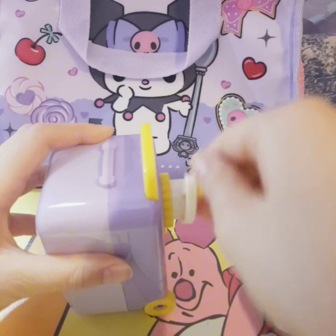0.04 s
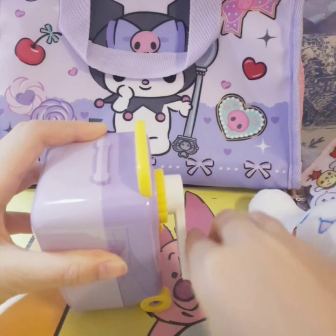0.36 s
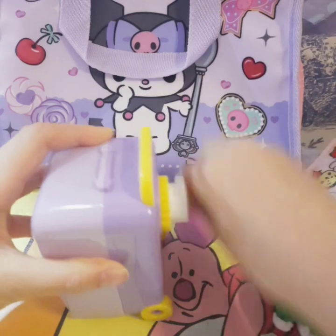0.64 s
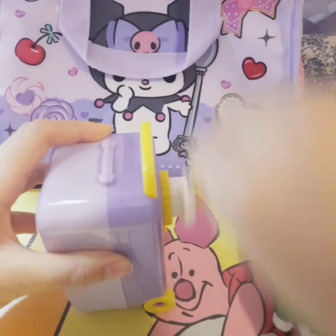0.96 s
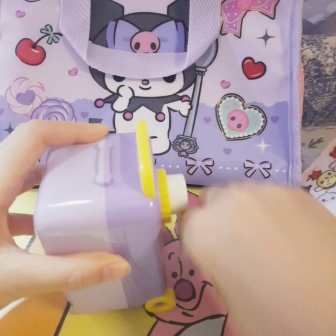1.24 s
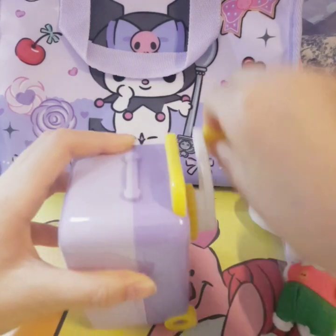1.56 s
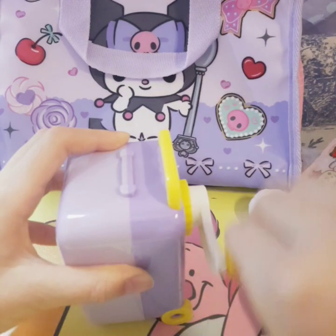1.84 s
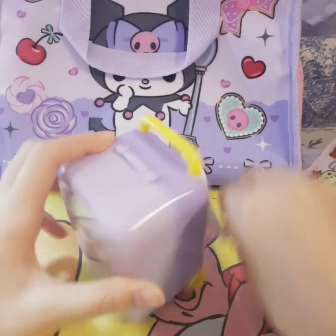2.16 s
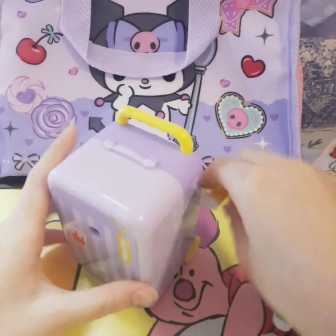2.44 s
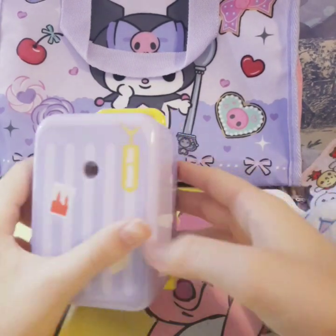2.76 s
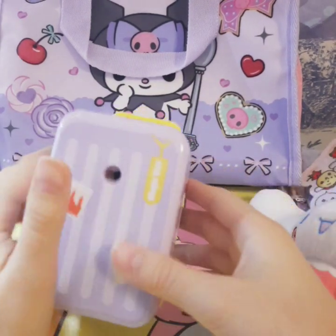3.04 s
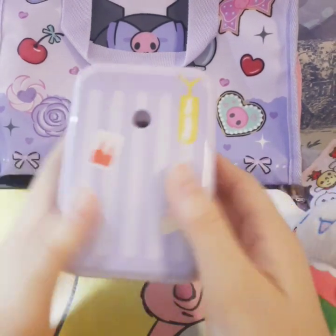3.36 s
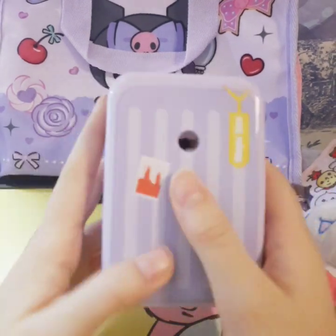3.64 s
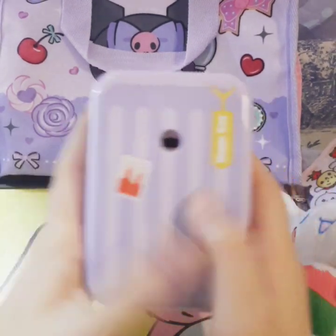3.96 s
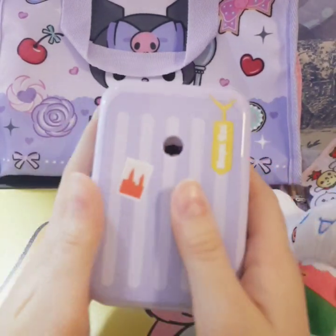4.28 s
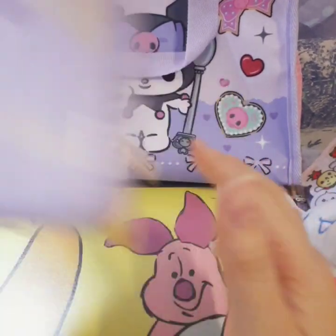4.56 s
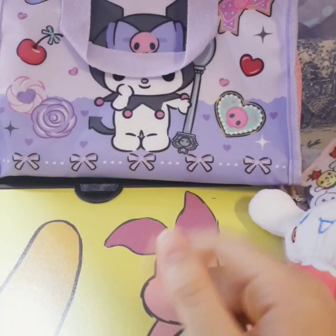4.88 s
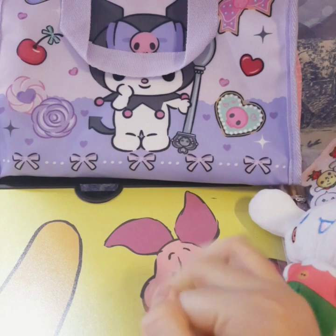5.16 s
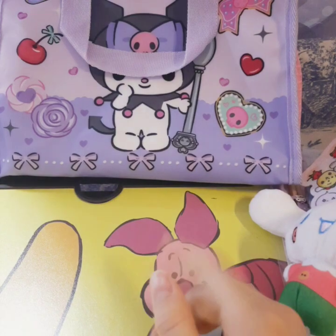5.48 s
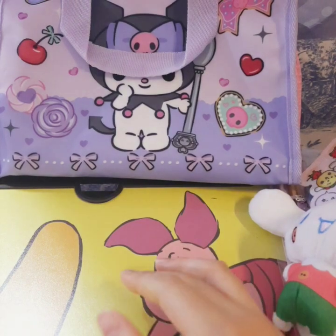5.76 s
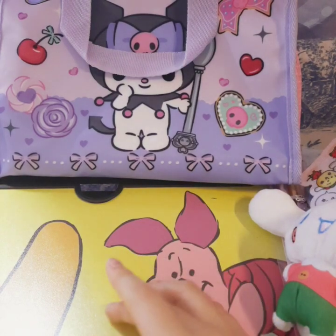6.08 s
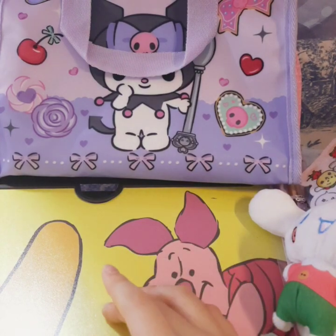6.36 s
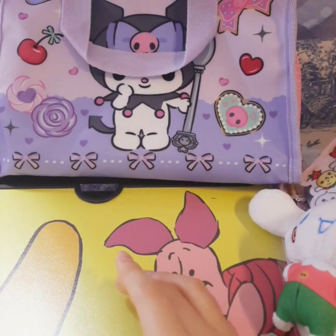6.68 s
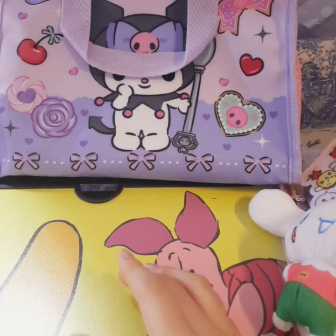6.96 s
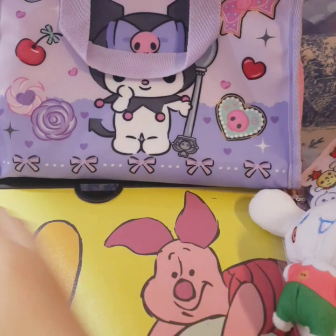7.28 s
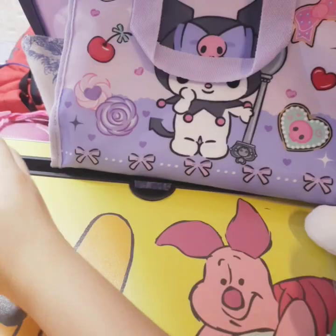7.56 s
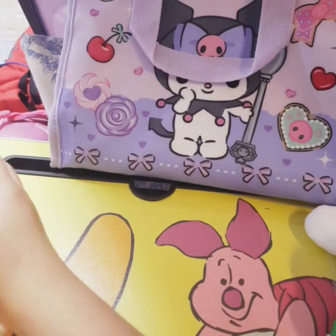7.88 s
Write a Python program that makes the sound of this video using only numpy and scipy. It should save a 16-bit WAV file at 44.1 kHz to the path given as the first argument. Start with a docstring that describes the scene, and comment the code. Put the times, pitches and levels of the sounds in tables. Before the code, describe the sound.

A plastic pencil sharpener is cranked with rasping, clacking gears, then handled with clicks and rubs, before microphone thumps and a metal clink.

```python
"""A plastic crank pencil sharpener on a desk in a small quiet room, close to a camera's stereo microphones.
For the first 2.7 s it is cranked: its gears rasp, knock and click, and its shaking booms through the
desk, mostly into the right microphone. It is then turned in the hands and put aside; fingers rub, tap
and squeak. After 7 s a hand takes hold of the camera's stand, which thumps, rumbles and clinks."""
import sys
import numpy as np
from scipy import signal
from scipy.fft import rfft, irfft, next_fast_len
from scipy.io import wavfile
from scipy.ndimage import map_coordinates

SR = 44100
rng = np.random.default_rng(int(sys.argv[2]) if len(sys.argv) > 2 else 0)


def wav_record(signal):
    """Record a signal, one row per channel, as 16-bit PCM in the file named by sys.argv[1]."""
    frames = np.transpose(np.atleast_2d(signal))
    bounded = np.clip(frames, -1, 1)
    # unit amplitude maps onto the largest positive 16-bit level
    quanta = np.round(bounded * 32767).astype(np.int16)
    wavfile.write(sys.argv[1], SR, quanta)


N = 349272

# the gears knock as they take up their play: start_s, level_db
GEAR_CLACKS = [(0.054, -35), (0.112, -30), (0.159, -32), (0.17, -29), (0.2205, -28), (0.3084, -43),
               (0.3615, -42), (0.4097, -41.5), (0.6844, -31), (0.724, -33), (0.7584, -27), (0.938, -49),
               (1.067, -42), (1.185, -31.5), (1.733, -38)]
# fingers sliding on plastic and on the mat: start_s, length_s, level_db, brightness_db
FINGER_RUBS = [(2.11, 0.087, -67, 4), (2.68, 0.011, -47, -12.5), (3.165, 0.073, -59, -23.5),
               (3.325, 0.025, -56, 1), (3.692, 0.035, -65, -5.5), (3.96, 0.05, -64, -7),
               (4.12, 0.094, -75.5, 0), (4.38, 0.12, -58.5, -12), (4.46, 0.041, -44.5, -5),
               (4.925, 0.078, -56.5, -29), (5.064, 0.16, -57, -7), (5.7, 0.038, -55.5, -9.5),
               (5.878, 0.055, -51, -6), (6.035, 0.083, -60.5, -14.5)]
# hard plastic contacts: start_s, level_db, brightness_db
PLASTIC_CLICKS = [(0.152, -32, -11.5), (0.2194, -33, -13), (0.2415, -34.5, -6.5), (0.6411, -24, -14),
                  (1.017, -45.5, -5), (1.1693, -32, -21), (1.252, -35, -3.5), (1.4613, -14, -9.5),
                  (1.829, -49.5, 1), (2.1158, -29, -15), (2.3202, -24, -14), (2.352, -17.5, -13),
                  (2.984, -40, -19.5), (3.3429, -22, -41.5), (3.6059, -37.5, -17.5), (4.4996, -27.5, -4),
                  (4.5257, -18.5, -18), (4.561, -33.5, 3), (5.0668, -34.5, -17), (5.219, -44, 4),
                  (5.8852, -42, -6), (7.894, -32, -5)]
# treble radiated by a contact itself: frequency_hz, gain_db
EDGE_SPECTRUM = [(1700, -30), (2800, 2), (4800, -2), (6000, 0), (8600, -8), (11000, -3), (15000, -10),
                 (17000, -24)]
RASP_ATTACK_S, RUB_ATTACK_S, RUB_RELEASE_S = 0.0073, 0.011, 0.011


def amp(db):
    """Decibels to gain."""
    return 10 ** (np.asarray(db) / 20)


def unit(x):
    """Scaled to rms 1."""
    return x / np.sqrt(np.mean(x ** 2) + 1e-20)


def along(points, hz):
    """(frequency_hz, value) points read on a log axis."""
    freqs, values = np.transpose(points)
    return np.interp(np.log(hz + 1), np.log(freqs + 1), values)


def curve(points):
    """(time_s, value) points read at every sample."""
    return np.interp(np.arange(N) / SR, *np.transpose(points))


def wobble(rate):
    """A smooth random curve, rate knots a second."""
    return map_coordinates(rng.standard_normal(int(N * rate / SR) + 4), [np.arange(N) * rate / SR])


def gate(start_s, end_s, edge_s):
    """Gain 1 between start and end, with soft edges."""
    t = np.arange(N) / SR
    return np.clip(np.minimum(t - start_s, end_s - t) / edge_s + .5, 0, 1)


def envelope(events, attack_s, release_s):
    """Summed gain of (start_s, length_s, level_db) events: each rises, holds and dies away."""
    gain, t = np.zeros(N + SR), np.arange(SR // 2) / SR
    for start, length, db in events:
        release = np.exp(-np.maximum(t - length, 0) / release_s)
        gain[round(start * SR):][:len(t)] += amp(db) * np.minimum(t / attack_s, 1) * release
    return gain[:N]


def filtered(x, response):
    """x times a complex response of frequency."""
    size = next_fast_len(N + SR // 2, True)
    return irfft(rfft(x, size) * response(np.fft.rfftfreq(size, 1 / SR)), size)[..., :N]


def through(x, response):
    """x through a response scaled to keep the power of white noise."""
    def levelled(hz):
        gain = response(hz)
        return gain / np.sqrt(np.mean(np.abs(gain) ** 2))
    return filtered(x, levelled)


def dull(x, edge_hz):
    """x with its treble rolled off above edge_hz."""
    return filtered(x, lambda hz: 1 / (1 + (hz / edge_hz) ** 4))


def colour(points):
    """Causal response with the gain of (frequency_hz, gain_db) points."""
    def response(hz):
        cepstrum = irfft(np.log(amp(along(points, hz))))
        half = len(cepstrum) // 2
        cepstrum[1:half] *= 2
        cepstrum[half + 1:] = 0
        return np.exp(rfft(cepstrum))
    return response


def resonances(modes):
    """Causal response of (pitch_hz, width_hz, gain_db) modes of alternating sign."""
    return lambda hz: sum((-1) ** k * amp(db) * 1j * hz * width / (pitch**2 - hz**2 + 1j * hz * width)
                          for k, (pitch, width, db) in enumerate(modes))


def pulses(rate, scatter, size_db):
    """An uneven pulse train of rms 1; scatter is in periods."""
    count = int(N / SR * rate)
    shift, size = rng.standard_normal((count, 2)).T
    at = ((np.arange(count) + scatter * shift) * SR / rate).astype(int) % N
    return unit(np.bincount(at, amp(size_db * np.clip(size, -2, 2)), N))


def bursts(rows, t60, rise_s=.0005):
    """Stereo bursts of micro-impacts, one for each (start_s, level_db) contact."""
    gain = envelope([(s, 0, db) for s, db in rows], rise_s, t60 / np.log(1000))
    return gain * rng.standard_normal((2, N))


def scrape(rate, scatter, size_db, t60, smooth):
    """Stereo noise of rms 1 made of tiny slips over a smooth share."""
    decay = amp(-60 * np.arange(SR // 20) / SR / t60)
    power = np.abs(signal.fftconvolve(pulses(rate, scatter, size_db) ** 2, decay ** 2)[:N])
    return unit(np.sqrt(power / power.mean() + smooth) * rng.standard_normal((2, N)))


def friction(rows, attack_s, release_s):
    """Gains of the body and the bright edge of (start_s, length_s, level_db, brightness_db) strokes."""
    body = envelope([(s, length, db) for s, length, db, _ in rows], attack_s, release_s)
    edge = envelope([(s, length, db + bright) for s, length, db, bright in rows], attack_s, release_s)
    return body, edge


def room_tone(level_db=-51, hum_db=-55, hum_hz=48.3):
    """Steady room noise with a low wavering hum."""
    spectrum = [(25, -22.5), (52, 5), (80, -5), (125, -5.5), (190, -10.5), (310, -4), (560, -1), (790, -12),
                (1500, -8.5), (2300, -18), (2850, -17.5), (3600, -27.5), (6300, -31.5), (9000, -40),
                (16000, -40)]  # the room's noise: frequency_hz, gain_db
    likeness = [(50, 1), (200, 1), (600, -0.27), (4000, 0)]  # between the microphones: frequency_hz, correlation
    balance = [(60, 6.5), (200, -4.5), (560, -11.5), (820, 10), (1500, -3.5), (2800, -2.5), (5000, -3)]  # left over right: frequency_hz, gain_db
    def mid_and_side(hz):
        angle = np.arccos(along(likeness, hz)) / 2
        return amp(along(spectrum, hz)) * np.array([np.cos(angle), np.sin(angle)])
    mid, side = filtered(rng.standard_normal((2, N)), mid_and_side)
    pair = np.array([mid + side, mid - side])
    pair = filtered(pair, lambda hz: amp(np.outer([.5, -.5], along(balance, hz))))
    hum = np.sin(2 * np.pi * hum_hz * np.arange(N) / SR + .8 * wobble(7)) * amp(2.5 * wobble(5))
    return amp(level_db) * unit(pair) + amp(hum_db) * hum


def room_tail(x):
    """The small room returns a short diffuse tail whose treble dies first."""
    decay_times = [(200, 0.3), (1500, 0.15), (6000, 0.13), (15000, 0.13)]  # reverberation: frequency_hz, t60_s
    hz, t, noise = signal.stft(rng.standard_normal((2, SR // 2)), SR, nperseg=256)
    tail = signal.istft(noise * amp(-60 * t / along(decay_times, hz)[:, None]), SR, nperseg=256)[1]
    tail = np.pad(tail / np.linalg.norm(tail[0]), ((0, 0), (SR // 200, 0)))
    return signal.fftconvolve(x, tail, axes=1)[:, :N]


def microphones(pair, shared=.55, lag_s=.00046):
    """Part of the close sound is common to both microphones and reaches the right one later."""
    late = filtered(pair[0], lambda hz: np.exp(-2j * np.pi * hz * lag_s))
    return np.array([pair[0], shared * late + np.sqrt(1 - shared ** 2) * pair[1]])


def holding():
    """Force of the hand on the camera's stand as a gain."""
    force = [(7.34, -51), (7.422, -18.5), (7.494, -27), (7.506, -41), (7.564, -23.5), (7.884, -20.5),
             (7.92, -14.5)]  # the hand's push: time_s, level_db
    return amp(curve(force)) * gate(force[0][0], np.inf, RUB_ATTACK_S)


def stand_grip(peak_s=7.385, width_s=0.04, brush_db=-33, left_db=-8, drag_db=-18.5):
    """The hand brushes along the stand as it closes on it, and drags on dully while it holds."""
    spectrum = [(40, -16), (140, -2), (600, -6), (1400, -18), (5000, -42), (12000, -39), (17000, -53)]  # hand noise on the stand: frequency_hz, gain_db
    swell = amp(brush_db) * np.exp(-((np.arange(N) / SR - peak_s) / width_s) ** 2 / 2)
    drag = dull(amp(drag_db) * holding() * rng.standard_normal((2, N)), edge_hz=2600)
    brush = swell * rng.standard_normal((2, N))
    return through(brush + drag, colour(spectrum)) * amp([[left_db], [0]])


def stand_joints():
    """The stand shifts: its small catch ticks brightly and its arm clunks."""
    # resonances of the catch and the arm: pitch_hz, width_hz, gain_db
    catch_modes = [(1200, 400, -14), (2148, 70, 2), (2810, 120, -3), (4900, 60, -4), (9900, 1800, -11)]
    arm_modes = [(865, 580, 0)]
    # blows on each: start_s, level_db
    ticks = [(7.696, -20)]
    clunks = [(7.441, -25.5), (7.894, -20)]
    catch = through(bursts(ticks, t60=0.016), resonances(catch_modes))
    arm = through(bursts(clunks, t60=0.02), lambda hz: resonances(arm_modes)(hz) ** 2)
    return catch + arm


def stand_clink(pan_db=2, crack_gain_db=2.0, crack_t60=0.029):
    """A metal part of the stand is struck, bounces and rings over a bright crack."""
    metal_modes = [(1157, -8, .17), (3015, 0, .12), (3200, -7, .06), (3456, -11, .09), (4414, -14, .09),
                   (4915, -13, .09), (6223, -8, .07), (7800, -14, .07), (10600, -10, .05)]  # the part's ringing: pitch_hz, gain_db, t60_s
    blows = [(7.751, -27, -24.5), (7.764, -23, -28.5), (7.778, -33, -36), (7.796, -33.5, -42.5)]  # the strike and its bounces: start_s, ring_db, crack_db
    t = np.arange(SR // 3) / SR
    ring, crack = np.zeros((2, 2, N + SR))
    for start, ring_db, crack_db in blows:
        span = slice(round(start * SR), round(start * SR) + len(t))
        decay = amp(crack_db + crack_gain_db - 60 * t / crack_t60)
        crack[:, span] += decay * rng.standard_normal((2, len(t)))
        for hz, db, t60 in metal_modes:
            # the loose part rattles, which smears its tones
            phase = rng.uniform(0, 2 * np.pi) + rng.normal(0, hz / SR / 2, (2, len(t))).cumsum(axis=1)
            ring[:, span] += amp(ring_db + db - 60 * t / t60) * np.sin(2 * np.pi * hz * t + phase)
    bright = colour([(2400, -20), (3000, 0), (8300, -4), (10500, 3), (17000, -9)])
    return (ring[:, :N] + through(crack[:, :N], bright)) * amp([[pan_db], [-pan_db]])


def finger_rubs(skin_db=9, edge_db=10):
    """Skin drags over the surfaces in fine, dense slips."""
    skin_spectrum = [(300, 3), (1000, 5.5), (1500, 7), (2000, -2), (2600, -6.5), (3500, -17), (6000, -30)]  # the body of a rub: frequency_hz, gain_db
    skin, edge = friction(FINGER_RUBS, RUB_ATTACK_S, RUB_RELEASE_S)
    slips = scrape(rate=200, scatter=.8, size_db=4, t60=.012, smooth=.5)
    squeaky = lambda hz: colour(EDGE_SPECTRUM)(hz) * (1 + resonances([(5250, 300, 7)])(hz))
    body = through(amp(skin_db) * skin * slips, colour(skin_spectrum))
    return body + through(amp(edge_db) * edge * slips, squeaky)


def finger_squeaks(rough_hz=260, flutter_hz=260, flutter_db=4):
    """Skin sticks and slips fast: a rough tone of level pitch whose phase and strength jump about."""
    squeaks = [(2.634, 0.034, 2960, -34.5), (5.065, 0.045, 5120, -46.5)]  # squeaking slides: start_s, length_s, pitch_hz, level_db
    out = np.zeros(N)
    slip = np.cumsum(rng.standard_normal(N)) * np.sqrt(2 * np.pi * rough_hz / SR)
    flutter = unit(amp(flutter_db * wobble(flutter_hz)))
    for start, length, hz, db in squeaks:
        tone = np.sin(2 * np.pi * hz * np.arange(N) / SR + slip)
        out += tone * flutter * envelope([(start, length, db)], RUB_ATTACK_S, RUB_RELEASE_S)
    return out


def cranking(stall_s=(1.2, 1.395), stall_db=-25, ease_s=0.043):
    """Effort on the crank as a gain; it stalls before the loudest snap and ends as the hand lets go."""
    effort = [(0.0, -36.5), (0.28, -34.5), (0.5, -35.5), (0.92, -30.5), (2.1, -38.5), (2.3, -34),
              (2.52, -37.5), (2.7, -41)]  # the shaking the crank gives the desk: time_s, level_db
    stalled = gate(*stall_s, ease_s)
    return amp(curve(effort) + stall_db * stalled) * gate(-1, effort[-1][0], ease_s)


def shaking(crank_db=-2.5, stand_db=-5.5, handling_db=-60, lurch_db=3, lurch_hz=32.92,
            knock_db=-12.0, click_db=-19, rub_db=-3, clack_db=1.0, contact_s=0.015):
    """Power fed into the desk: the hands' uneven push, knocks, and a share of each click, clack and rub."""
    knocks = [(0.145, -13, 0.022), (0.212, -12, 0.035), (0.297, -18, 0.019), (0.357, -19.5, 0.023),
              (0.681, -15.5, 0.029), (0.734, -13.5, 0.038), (1.003, -18.5, 0.027), (1.179, -20.5, 0.056),
              (1.259, -17, 0.044), (1.455, -7, 0.026), (1.735, -17.5, 0.03), (1.875, -20.5, 0.034),
              (2.13, -15.5, 0.015), (2.244, -12.5, 0.017), (2.319, -15, 0.042), (2.464, -18.5, 0.0053),
              (2.534, -20, 0.027), (2.623, -16.5, 0.031), (2.836, -24, 0.026), (2.901, -25.5, 0.041),
              (3.016, -28, 0.022), (3.498, -36, 0.016), (3.909, -38, 0.025), (4.126, -33.5, 0.025),
              (4.196, -42, 0.027), (4.363, -34.5, 0.018), (4.429, -39, 0.013), (4.557, -34, 0.049),
              (7.161, -25, 0.056), (7.287, -26, 0.038), (7.776, -18, 0.022), (7.876, -12, 0.061)]  # dull knocks on the desk and stand: start_s, level_db, hold_s
    push = cranking() * amp(crank_db) + holding() * amp(stand_db) + amp(handling_db)
    push *= amp(lurch_db * wobble(lurch_hz))
    blows = [(s, hold, db + knock_db) for s, db, hold in knocks]
    blows += [(s, contact_s, db + click_db) for s, db, _ in PLASTIC_CLICKS]
    thumps = envelope(blows, attack_s=0.0087, release_s=0.011)
    drag = amp(rub_db) * friction(FINGER_RUBS, RUB_ATTACK_S, RUB_RELEASE_S)[0]
    kicks = envelope([(s, 0, db + clack_db) for s, db in GEAR_CLACKS], RASP_ATTACK_S, contact_s)
    return push ** 2 + thumps ** 2 + drag ** 2 + kicks ** 2


def desk_boom(level_db=9.0, grip_left_db=-6, shared=0.56):
    """Chattering contacts ring the desk and stand, mostly into the right microphone."""
    desk_modes = [(129.4, 27.5, -17), (298.2, 21.4, 3), (394.5, 33.4, 4.5), (458.5, 59, -9),
                  (593.5, 69, -7)]  # desk and stand resonances: pitch_hz, width_hz, gain_db
    skirt = [(30, 21), (90, -0.5), (620, -5), (800, -19), (1300, -13), (3000, -48.5), (8000, -42)]  # spectral slope around them: frequency_hz, gain_db
    left_path = [(60, 1.5), (120, -12), (400, -14), (510, -6), (620, -19), (850, 3.5)]  # from desk to left microphone: frequency_hz, gain_db
    power = shaking()
    chatter = pulses(rate=300, scatter=.6, size_db=1.0) * rng.standard_normal((2, N))
    ring = filtered(chatter, lambda hz: resonances(desk_modes)(hz) * colour(skirt)(hz))
    # the modes beat against each other while the hand's force sets their joint strength
    window = np.hanning(SR // 25)
    strength = np.abs(signal.fftconvolve(ring * ring, window[None] / window.sum(), "same", axes=1))
    boom, sway = ring * np.sqrt(power / (strength + 1e-12))
    left = filtered(shared * boom + np.sqrt(1 - shared ** 2) * sway, lambda hz: amp(along(left_path, hz)))
    # the grip on the stand feeds the right microphone almost alone
    held = gate(start_s=7.1, end_s=9, edge_s=.1)
    return amp(level_db) * np.array([left * amp(grip_left_db * held), boom])


def plastic_case(shell, edge):
    """The hollow case rings low; the contact itself radiates the treble."""
    case_modes = [(920, 763, 4), (1688, 98, 8), (1806, 350, 4.5), (2916, 306, 2.5), (3515, 390, -0.5)]  # the case's resonances: pitch_hz, width_hz, gain_db
    hollow = dull(through(shell, resonances(case_modes)), edge_hz=3180)
    return hollow + through(edge, colour(EDGE_SPECTRUM))


def plastic_clicks(shell_db=6, edge_db=10, rise_s=0.0025, shell_t60=0.027, edge_t60=0.028):
    """Each contact is a burst of micro-impacts that dies within a few hundredths of a second."""
    shell = bursts([(s, db + shell_db) for s, db, _ in PLASTIC_CLICKS], shell_t60, rise_s)
    edge = bursts([(s, db + bright + edge_db) for s, db, bright in PLASTIC_CLICKS], edge_t60, rise_s)
    return plastic_case(shell, edge)


def gear_clacks(level_db=1):
    """The loose gears take up their play and knock hollowly."""
    gear_modes = [(576, 240, 6), (2040, 320, -2), (3970, 510, -8)]  # the wheels in their housing: pitch_hz, width_hz, gain_db
    return amp(level_db) * through(bursts(GEAR_CLACKS, t60=0.022), resonances(gear_modes))


def gear_rasp(case_db=10, edge_db=12, running_case_db=-15, running_edge_db=-33):
    """The gears scrape softly and unevenly; where the crank catches, their teeth skip in a quick rasp."""
    rasps = [(0.14, 0.029, -39.5, -15), (0.62, 0.15, -53, -11), (0.76, 0.078, -53.5, -1),
             (1.025, 0.05, -64, 0), (2.086, 0.153, -48.5, -13.5), (2.617, 0.0564, -47, -6)]  # the gears catch: start_s, length_s, level_db, brightness_db
    case, edge = friction(rasps, RASP_ATTACK_S, release_s=0.004)
    teeth = scrape(rate=74, scatter=.18, size_db=2.5, t60=.03, smooth=.3)
    running = cranking() * scrape(rate=40, scatter=.8, size_db=3, t60=.07, smooth=.6)
    shell = case * amp(case_db) * teeth + running * amp(running_case_db)
    treble = edge * amp(edge_db) * teeth + running * amp(running_edge_db)
    return plastic_case(shell, dull(treble, edge_hz=9000))  # the closed case muffles the gears


def scene(tail_db=-8.0):
    """Close airborne sounds in the room, over the desk's boom, the hand on the stand and the room tone."""
    right_response = [(2000, 1.5), (3200, 0), (6500, 2), (7800, -1), (9300, -12), (12000, -10)]  # the duller right microphone: frequency_hz, gain_db
    close = gear_rasp() + gear_clacks() + finger_rubs() + finger_squeaks() + plastic_clicks()
    close = microphones(close + stand_joints()) + stand_clink()
    heard = close + amp(tail_db) * room_tail(close)
    heard[1] = filtered(heard[1], colour(right_response))
    return heard + desk_boom() + stand_grip() + room_tone()


def record(dry, low_cut_hz=40, top_hz=16300):
    """The camera cuts the deepest bass and keeps nothing above its band limit."""
    return filtered(dry, lambda hz: (hz < top_hz) * (1 - 1 / (1 + (hz / low_cut_hz) ** 8)))


dry = scene()
out = record(dry)
wav_record(out)
```